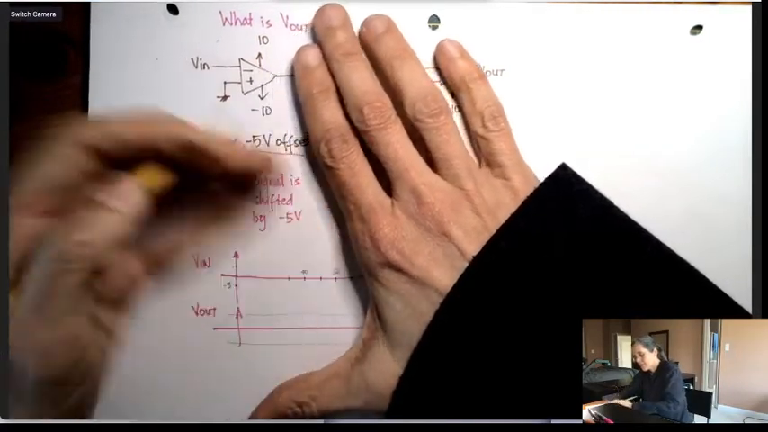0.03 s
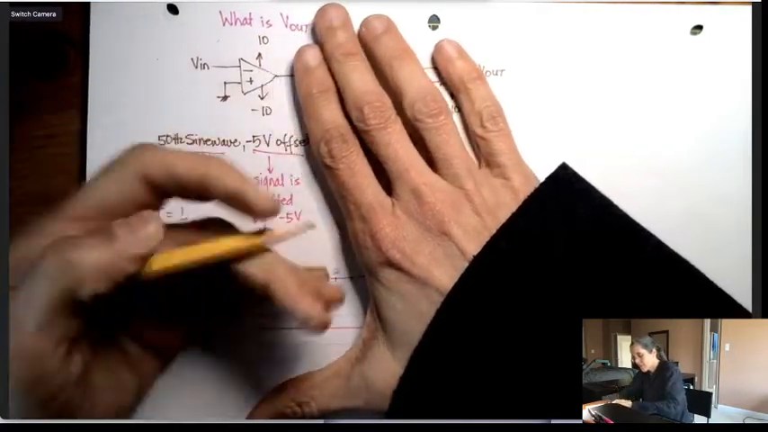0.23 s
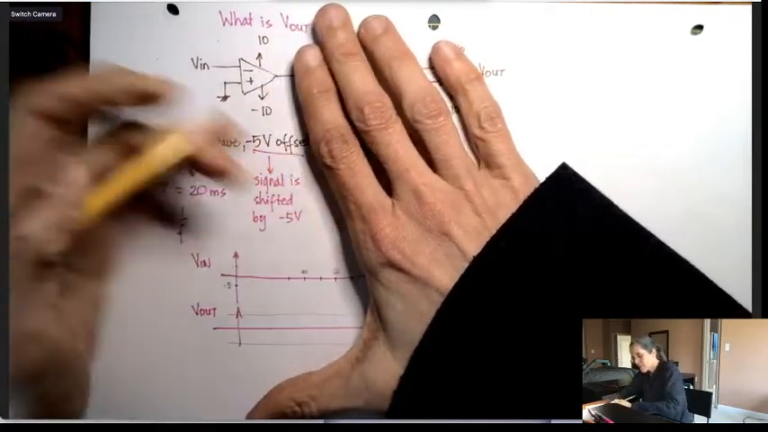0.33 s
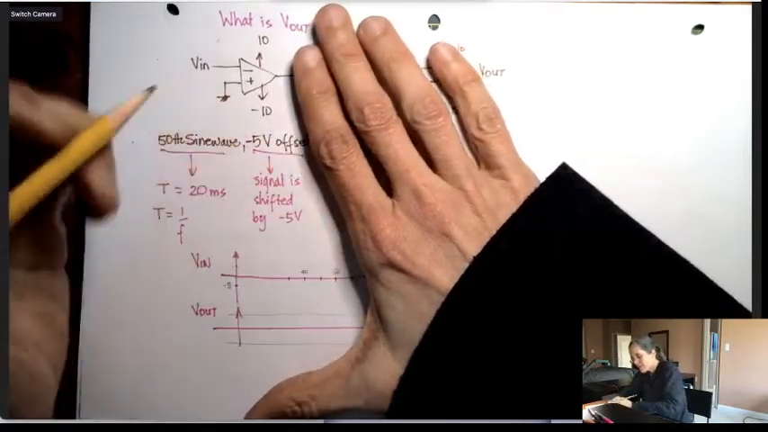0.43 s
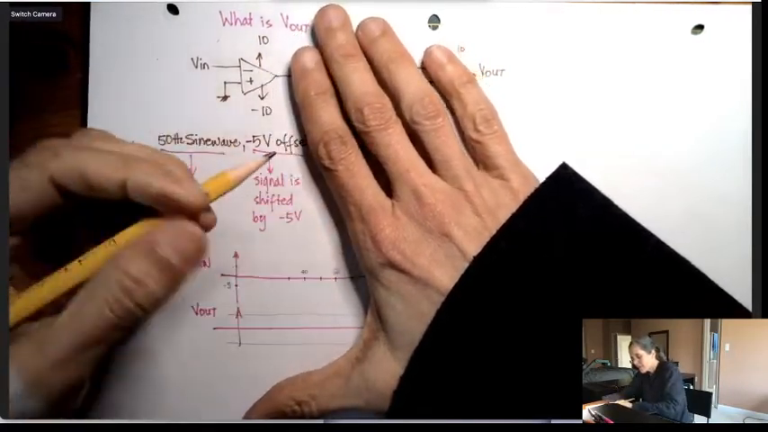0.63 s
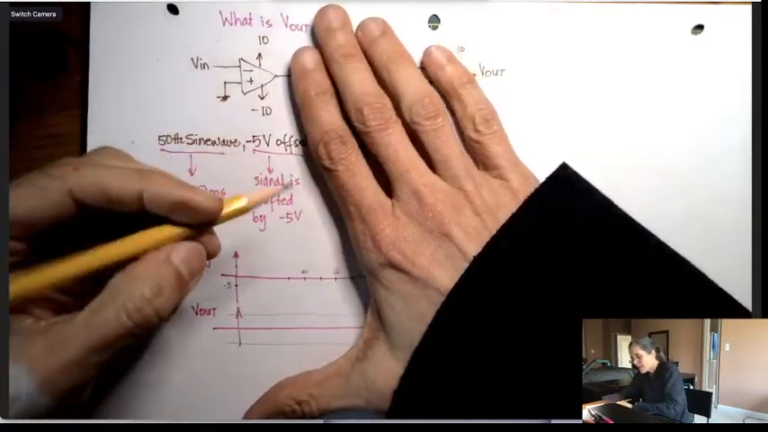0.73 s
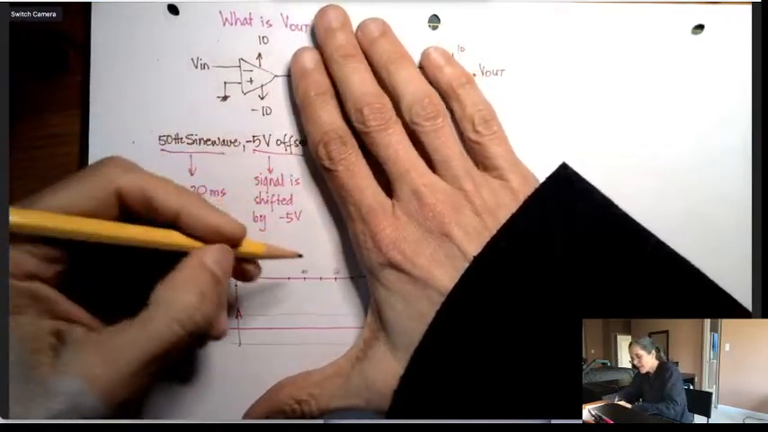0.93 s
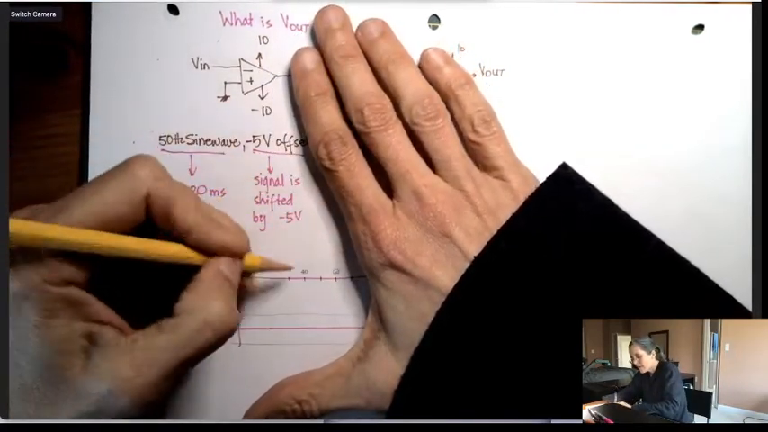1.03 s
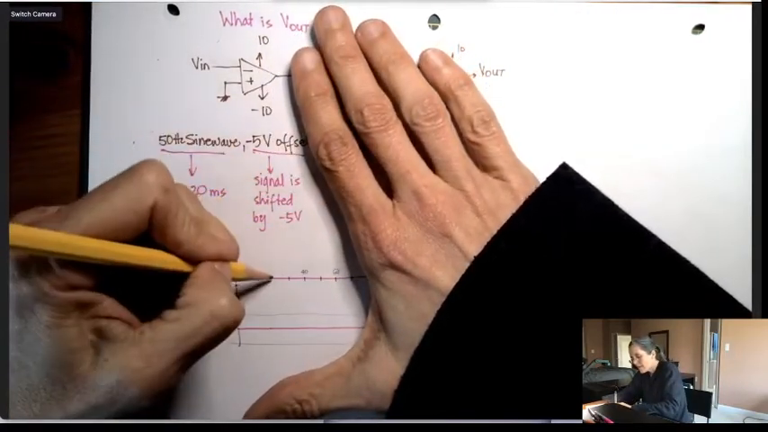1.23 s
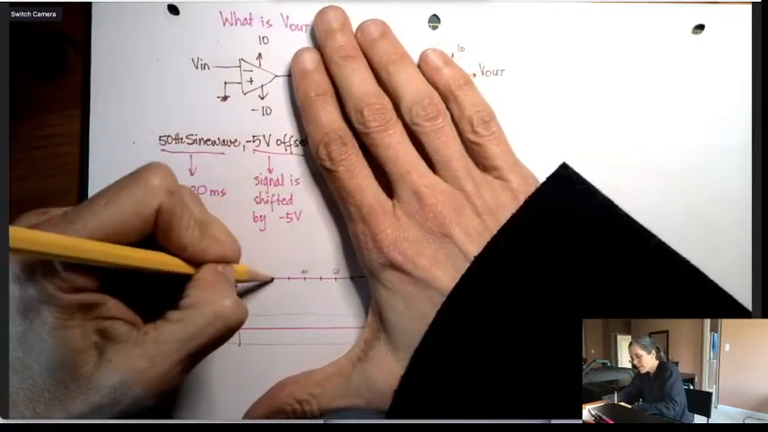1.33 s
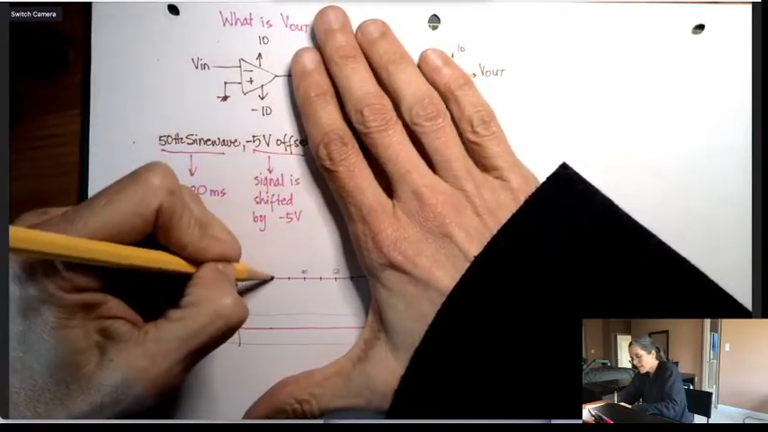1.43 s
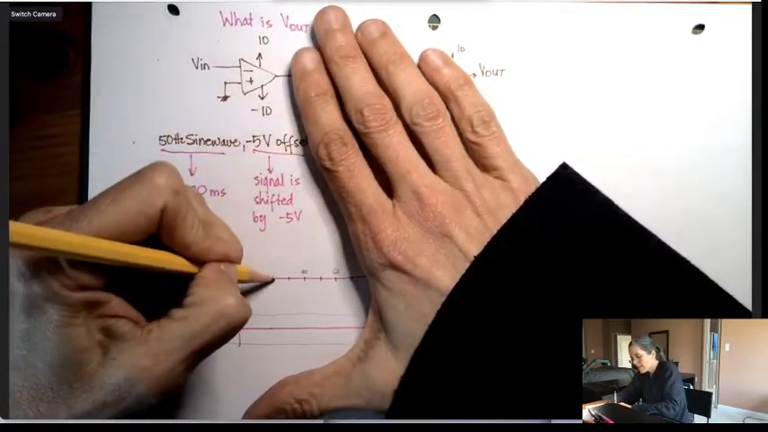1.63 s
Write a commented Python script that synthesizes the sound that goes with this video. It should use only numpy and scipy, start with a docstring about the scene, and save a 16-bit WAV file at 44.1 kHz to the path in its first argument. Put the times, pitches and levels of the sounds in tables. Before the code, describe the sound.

Two quick swishes of skin on paper come with soft desk thumps, the second stronger. A light pencil tick and a brief rub follow. The microphone is close, in a small room with a low hum.

```python
"""Brushing eraser crumbs off paper

A desk in a small, quietly humming room, one microphone close to the sheet. A hand lands twice and
brushes the crumbs away: a dull knock from the desk, then a short swish of skin on paper. The moving
arm stirs the air at the microphone. The pencil ticks once as it is gripped anew, and the hand slides
into place to write."""
import sys
import numpy as np
from scipy import signal
from scipy.fft import rfft, irfft
from scipy.io import wavfile

SR = 44100
rng = np.random.default_rng(int(sys.argv[2]) if len(sys.argv) > 2 else 0)


def store_wav(level_fs):
    """Save 16-bit WAV to argv[1]."""
    pcm = np.round(np.clip(np.atleast_2d(level_fs), -1, 1) * 32767)
    wavfile.write(sys.argv[1], SR, pcm.T.astype(np.int16))


N = 74970
T = np.arange(N) / SR
FREQS = np.fft.rfftfreq(N, 1 / SR)


def from_db(db):
    """Decibels to gain."""
    return 10 ** (np.asarray(db) / 20)


def unit_rms(x):
    """Scale to rms 1."""
    return x / np.sqrt(np.mean(x ** 2) + 1e-20)


def low_pass(x, hz, order=2):
    """Butterworth low-pass."""
    return signal.sosfilt(signal.butter(order, min(hz, .45 * SR), fs=SR, output="sos"), x + 1e-18)


def colour(x, spectrum):
    """Shape a signal by a spectrum drawn on a log-frequency axis; rms 1."""
    hz, db = np.transpose(spectrum)
    gain = from_db(np.interp(np.log(np.maximum(FREQS, 1)), np.log(hz), db))
    return unit_rms(irfft(rfft(x) * gain, N))


def noise_band(hz, half_width_hz):
    """Noise in one resonance, rms 1; centred on 0 Hz it is a slow random wander."""
    gain = 1 / (1 + ((FREQS - hz) / half_width_hz) ** 2)
    return unit_rms(irfft(rfft(rng.standard_normal(N)) * gain, N))


def decay(start, t60):
    """An envelope that jumps to 1 and falls 60 dB in t60 seconds."""
    return (T >= start) * from_db(-60 * np.maximum(T - start, 0) / t60)


def swell(centre, half_length):
    """A bell-shaped rise and fall about a moment."""
    return np.exp(-.5 * ((T - centre) / half_length) ** 2)


def burst(start, t60):
    """A dying burst of white noise."""
    return rng.standard_normal(N) * decay(start, t60)


def struck(modes, start):
    """The modes of a body ring from one blow, signs alternating."""
    return sum((-1) ** k * from_db(db) * decay(start, t60) * np.sin(2 * np.pi * hz * (T - start))
               for k, (hz, db, t60) in enumerate(modes))


def reverberate(x, t60):
    """The room's diffuse tail, from an impulse response of unit energy."""
    tail = burst(0, t60)
    return signal.fftconvolve(x, tail / np.linalg.norm(tail))[:N]


# spectrum of the room's background: f/Hz, relative level/dB
ROOM_SPECTRUM = [(40, 2.5), (65, 2), (90, -9.5), (115, -3.5), (160, -3), (190, -4), (235, -3.5), (280, -10),
                 (335, -8), (420, -16), (620, -21), (850, -22), (1180, -15), (1550, -24.5), (1900, -27.5),
                 (2600, -33.5), (5000, -37.5), (9000, -40), (15500, -41)]


def room_tone(level_db=-60):
    """Steady, mostly low noise all round the desk."""
    return from_db(level_db) * colour(rng.standard_normal(N), ROOM_SPECTRUM)


# bands of the fan's hum: f/Hz, width/Hz, level/dB
FAN_BANDS = [(114.3, 4.3, -71.5), (241.4, 20, -68)]


def fan(whine_hz=976, whine_db=-81.5, flutter_db=1.5):
    """A fan hums in the background, with a faint whine that flickers in level."""
    hum = sum(from_db(db) * noise_band(hz, width / 2) for hz, width, db in FAN_BANDS)
    whine_gain = from_db(whine_db + flutter_db * noise_band(0, 15))
    return hum + whine_gain * np.sin(2 * np.pi * whine_hz * T)


# course of the drone: t/s, level/dB
DRONE_LEVELS = [(0, -68.5), (0.78, -68.5), (0.92, -62), (1.7, -64.5)]


def drone(hz=222.4, width_hz=24):
    """A low drone in the room swells about halfway through."""
    return from_db(np.interp(T, *np.transpose(DRONE_LEVELS))) * noise_band(hz, width_hz / 2)


# strength of the draught at the microphone: t/s, relative level/dB
DRAUGHT_LEVELS = [(0, -42), (0.08, -52.5), (0.124, -41), (0.288, -34), (0.361, -42.5), (0.429, -22),
                  (0.499, -24), (0.58, -35), (0.74, -40), (0.82, -33.5), (1.02, -41.5), (1.1, -41.5),
                  (1.349, -44.5), (1.7, -46)]


def draught(flutter_hz=20, wander=.13, swing_db=1, trim_db=-3, rumble_db=-3, cutoff_hz=52):
    """Air stirred by the arm makes a deep, uneven flutter right at the microphone."""
    strength = from_db(trim_db + np.interp(T, *np.transpose(DRAUGHT_LEVELS)))
    pitch = flutter_hz * (1 + wander * noise_band(0, 10.1))
    flutter = np.sqrt(2) * np.sin(2 * np.pi * np.cumsum(pitch) / SR)
    flutter *= from_db(swing_db * noise_band(0, 5))
    rumble = from_db(rumble_db) * noise_band(9.1, 3.6)
    return low_pass(strength * (flutter + rumble), cutoff_hz, order=3)


# modes of the desk: f/Hz, relative level/dB, t60/s
DESK_MODES = [(62, -11, 0.2), (111.6, -12.5, 0.61), (163, -2.5, 0.064), (239, -6, 0.12), (323.9, -1, 0.12),
              (340.3, -5, 0.22), (401.5, -8, 0.13), (460, -6, 0.054), (789, -9, 0.037), (960, -19, 0.02)]
# the hand lands: t/s, knock gain/dB, contact cut-off/Hz, paper slap gain/dB
LANDINGS = [(0.002, -39, 430, -95), (0.2925, -31.5, 493, -53)]


def knocks(rebound_s=.01291, rebound_db=-17.5, thud_db=-11, slap_cutoff_hz=3100):
    """A soft blow rings the desk, and again as the flesh settles; the sheet slaps faintly."""
    out = 0
    for start, db, contact_hz, slap_db in LANDINGS:
        ring = struck(DESK_MODES, start) + from_db(rebound_db) * struck(DESK_MODES, start + rebound_s)
        thud = from_db(thud_db) * noise_band(326, 250) * decay(start, t60=.08)
        slap = low_pass(burst(start, t60=.014), slap_cutoff_hz)
        out += from_db(db) * low_pass(ring + thud, contact_hz) + from_db(slap_db) * slap
    return out


# spectrum of skin on paper, heard close: f/Hz, relative level/dB
FRICTION_SPECTRUM = [(500, 6.5), (900, 2.5), (1800, -1.5), (2700, -11), (3700, -7.5), (4400, -4),
                     (5100, -6), (5800, -1), (6500, -3.5), (7600, 2.5), (9200, 0.5), (12700, 3),
                     (14000, -1), (15500, -1)]


def friction(catches_per_s=6000, catch_gain=.35):
    """Hiss of skin on paper, with tiny catches on single fibres; rms 1."""
    catches = rng.standard_normal(N) * (rng.random(N) < catches_per_s / SR)
    grain = rng.standard_normal(N) + catch_gain * unit_rms(catches)
    return colour(grain, FRICTION_SPECTRUM)


# brush strokes: start t/s, fastest t/s, lift-off t/s, gain/dB, rise/dB, brightening/(dB per octave)
STROKES = [(0.029, 0.106, 0.11, -63.5, 7.5, 10), (0.325, 0.357, 0.38, -58, 5, 3.5)]


def brushing(attack_s=.024, release_t60=.09, pivot_hz=9000, room_db=-5, wall_cutoff_hz=6500):
    """The hiss swells and brightens with speed, dies after lift-off and lingers dully in the room."""
    hiss_spectrum = rfft(friction())
    octaves = np.log2(np.maximum(FREQS / pivot_hz, .5))
    direct = 0
    for start, fastest, lift, db, rise_db, tilt_db in STROKES:
        onset = np.clip((T - start) / attack_s + 1, 0, 1)
        approach_db = np.interp(T, [start, fastest], [-rise_db, 0])
        release_db = -60 * np.maximum(T - lift, 0) / release_t60
        envelope = onset * from_db(db + approach_db + release_db)
        dull = irfft(hiss_spectrum * from_db(-tilt_db * octaves), N)
        bright = irfft(hiss_spectrum * from_db(.5 * tilt_db * octaves), N)
        progress = np.interp(T, [start, lift], [0, 1])
        direct += envelope * ((1 - progress) * dull + progress * bright)
    tail = low_pass(reverberate(direct, t60=.56), wall_cutoff_hz, order=1)
    return direct + from_db(room_db) * tail


# squeaks on the sheet: t/s, half-length/s, level/dB
SKIN_SQUEAKS = [(0.039, 0.0036, -63.5), (0.987, 0.011, -88.5), (1.658, .01, -82.5)]


def squeaks(hz=4070, width_hz=450):
    """Skin squeaks briefly on the paper, in one narrow band."""
    envelope = sum(from_db(db) * swell(centre, half) for centre, half, db in SKIN_SQUEAKS)
    return envelope * noise_band(hz, width_hz / 2)


# resonances of the rubbing: f/Hz, width/Hz, relative level/dB
RUB_BANDS = [(837, 62, 2.5), (1180, 680, 4.5), (1490, 98, -9), (1913, 480, -3)]
# the hand drags over the sheet: t/s, half-length/s, rub level/dB, desk rumble level/dB
HAND_DRAGS = [(0.074, 0.007, -61, -58), (0.111, 0.011, -65, -60.5), (0.384, 0.024, -78.5, -55),
              (0.593, 0.006, -64.5, -73), (1.662, .024, -66.5, -70)]


def drags(mode_width_hz=16):
    """Slow rubbing sounds dull and stirs the modes of the desk under the sheet."""
    rub = unit_rms(sum(from_db(db) * noise_band(hz, width / 2) for hz, width, db in RUB_BANDS))
    desk = unit_rms(sum(from_db(db) * t60 * noise_band(hz, mode_width_hz / 2)
                        for hz, db, t60 in DESK_MODES))
    return sum(swell(centre, half) * (from_db(rub_db) * rub + from_db(desk_db) * desk)
               for centre, half, rub_db, desk_db in HAND_DRAGS)


# modes of the pencil, damped by the fingers: f/Hz, relative level/dB, t60/s
PENCIL_MODES = [(1140, 3, .06), (1500, -8, .04), (1860, -2, .06), (2150, -7, .04), (3300, -10, .03),
                (6100, -7, .025), (9400, -9, .02)]
# spectrum of the room's answer to the tick: f/Hz, relative level/dB
TICK_ROOM_SPECTRUM = [(600, -23), (1150, 17), (2000, 8), (2700, 1.5), (4500, -7), (6200, 4), (8000, -0.5),
                      (9500, -6), (14000, -12)]
# quick touches against the fingers, heard as one tick: t/s, gain/dB, contact cut-off/Hz
PENCIL_TOUCHES = [(1.3403, -63.5, 10000), (1.3423, -61, 8900), (1.353, -60.5, 2010), (1.38, -65.5, 2500)]


def pencil_tick(crack_db=4, room_db=-6.5):
    """Each touch cracks, rings the pencil and leaves a short tail in the room."""
    out = 0
    for start, db, contact_hz in PENCIL_TOUCHES:
        crack = from_db(crack_db) * burst(start, t60=.0097)
        direct = low_pass(struck(PENCIL_MODES, start) + crack, contact_hz, order=1)
        tail = colour(rng.standard_normal(N), TICK_ROOM_SPECTRUM) * decay(start, t60=.13)
        out += from_db(db) * (direct + from_db(room_db) * tail)
    return out


def scene():
    """One microphone at the desk: hand and pencil close up, the room behind."""
    close = knocks() + brushing() + drags() + squeaks() + pencil_tick() + draught()
    background = fan() + drone() + room_tone()
    return (close + background)[None]


def record(dry):
    """The microphone's signal is cut steeply above 15.8 kHz."""
    return signal.sosfilt(signal.ellip(12, .1, 80, 15800, fs=SR, output="sos"), dry)


dry = scene()
out = record(dry)
store_wav(out)
```